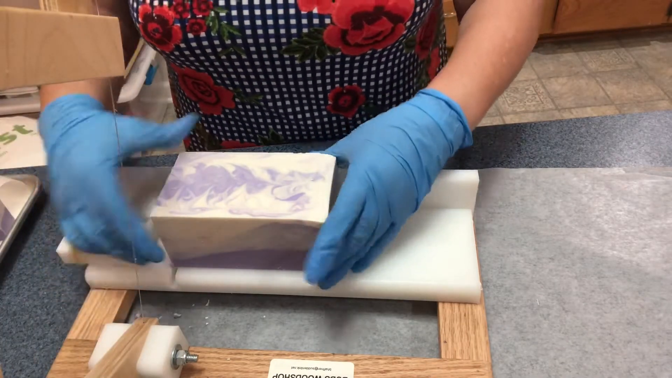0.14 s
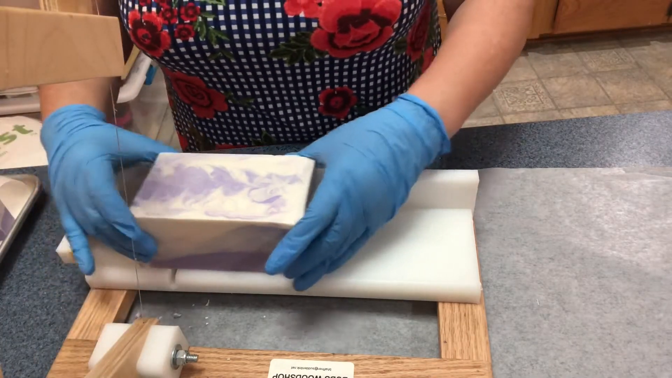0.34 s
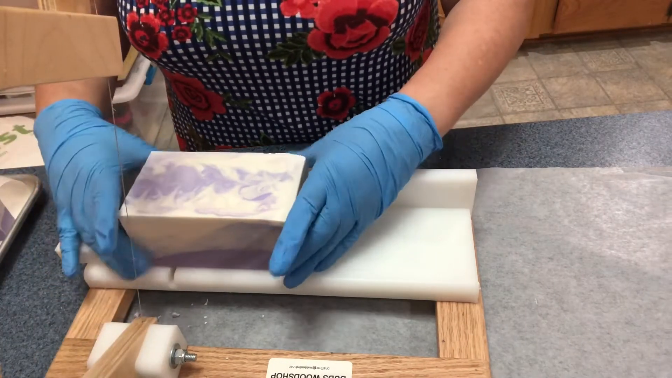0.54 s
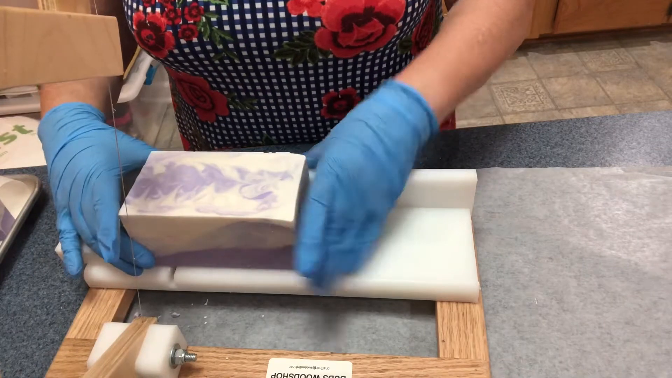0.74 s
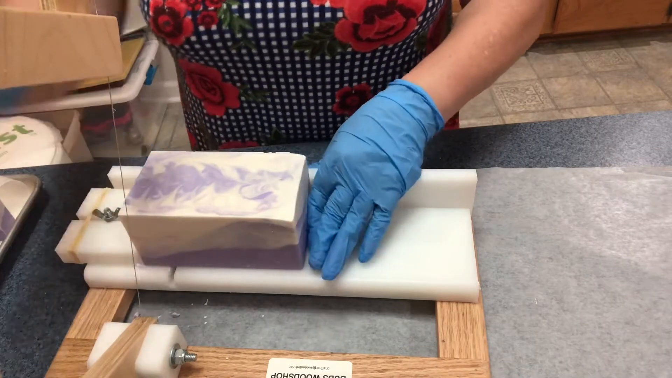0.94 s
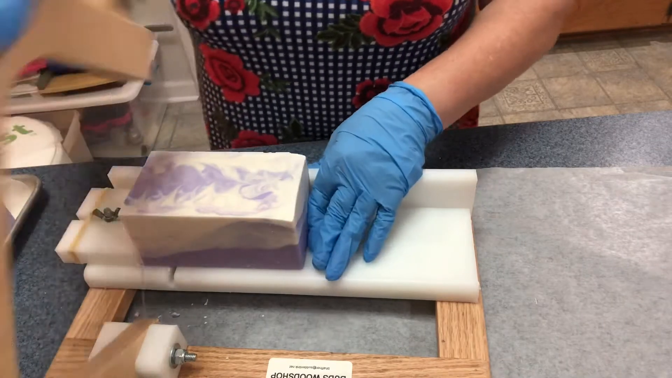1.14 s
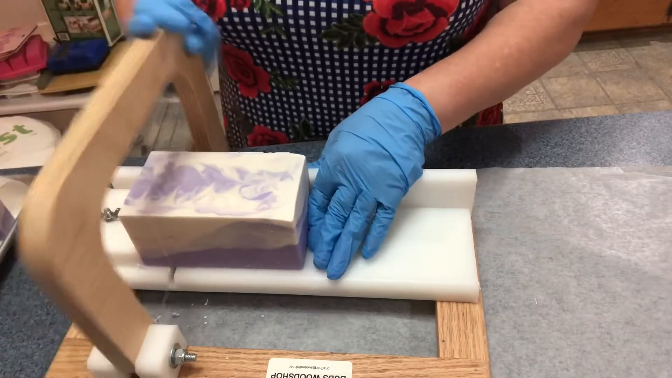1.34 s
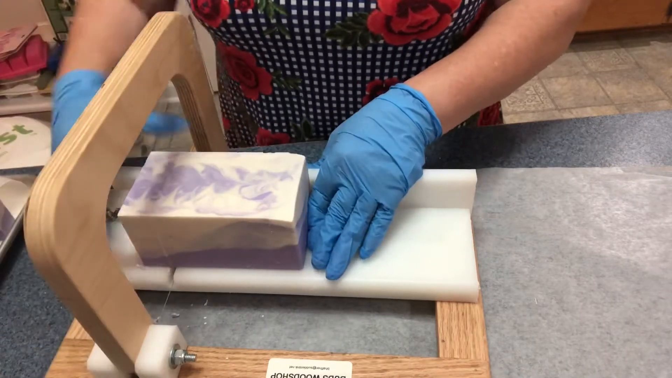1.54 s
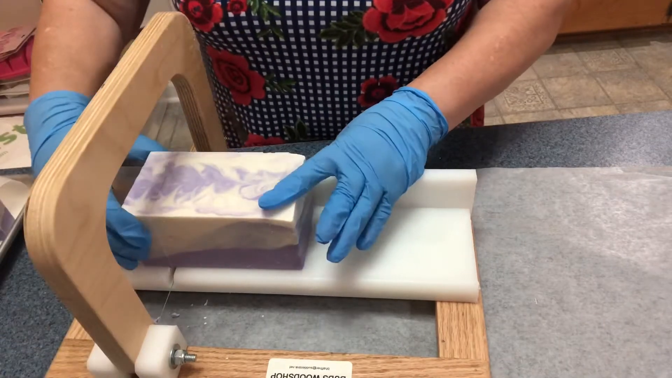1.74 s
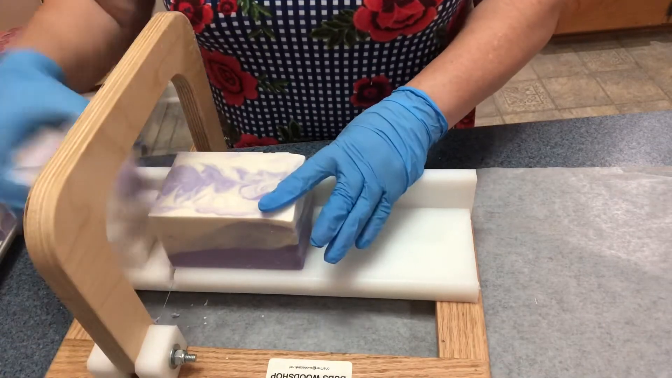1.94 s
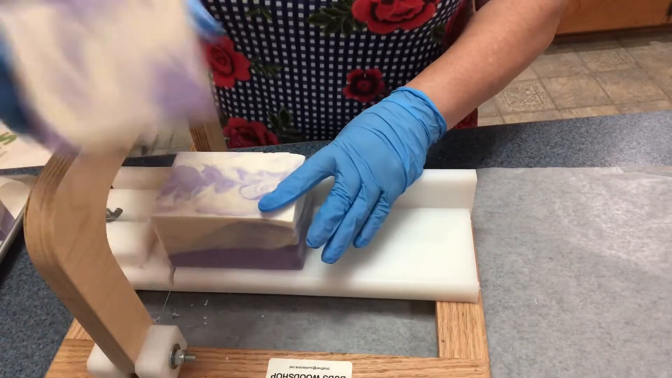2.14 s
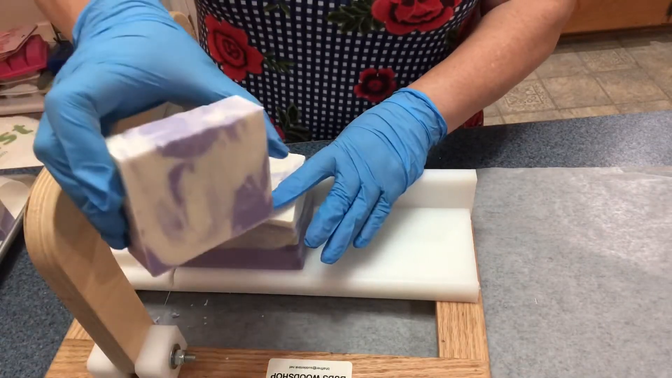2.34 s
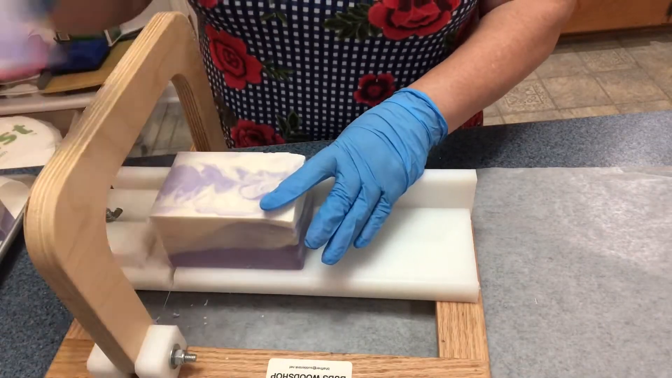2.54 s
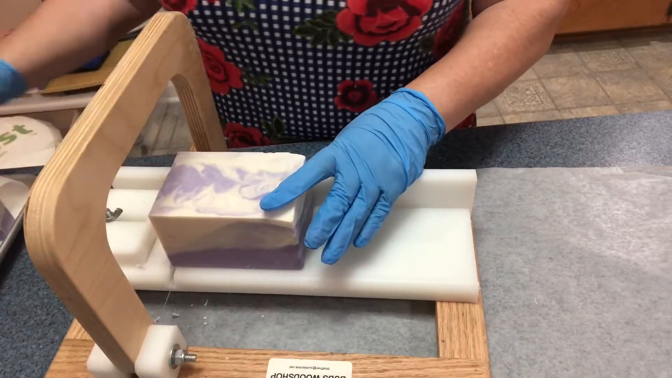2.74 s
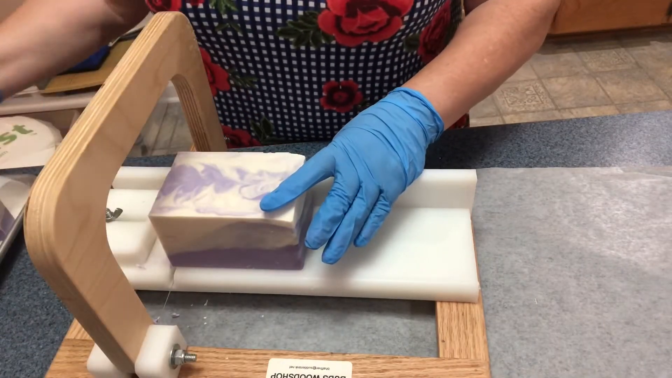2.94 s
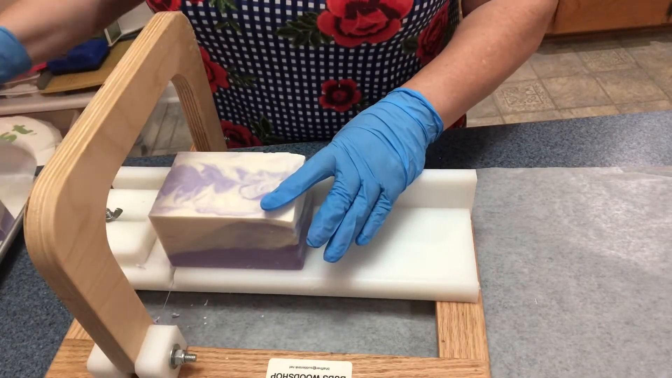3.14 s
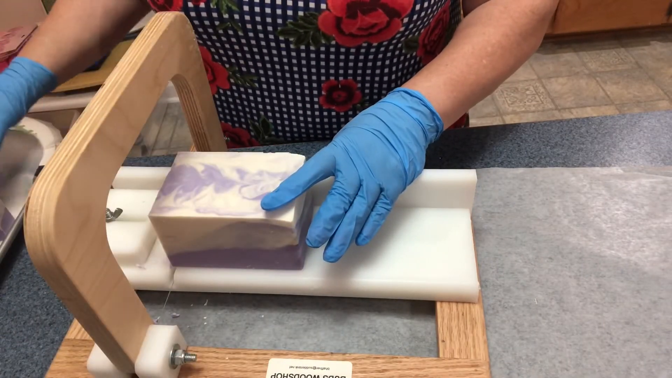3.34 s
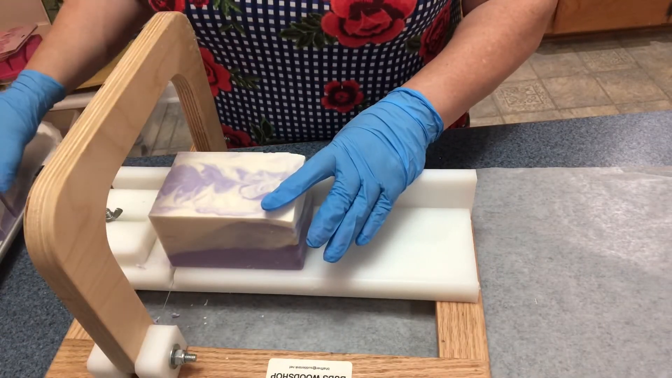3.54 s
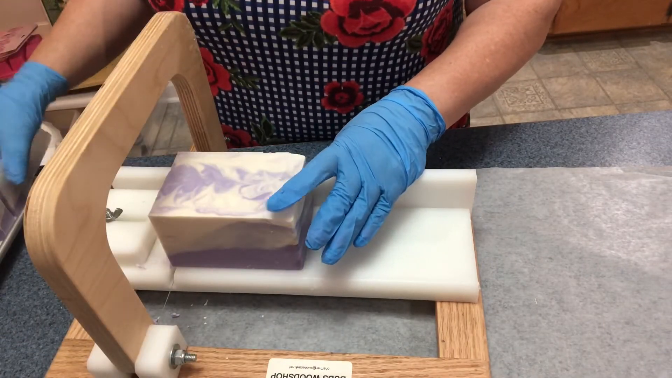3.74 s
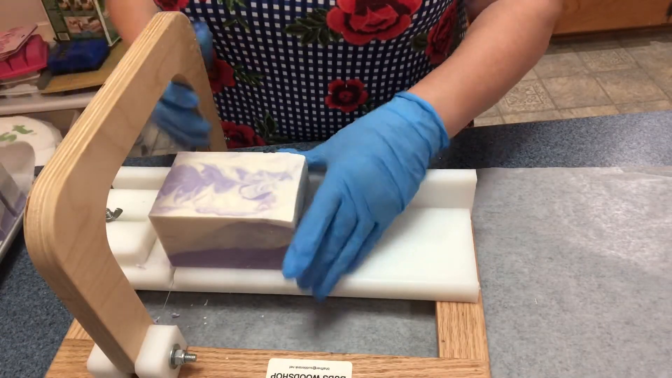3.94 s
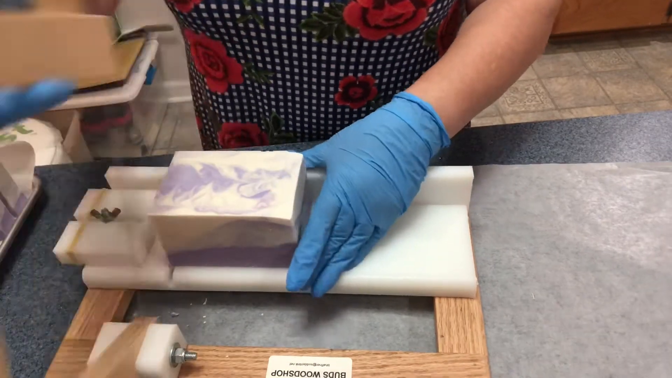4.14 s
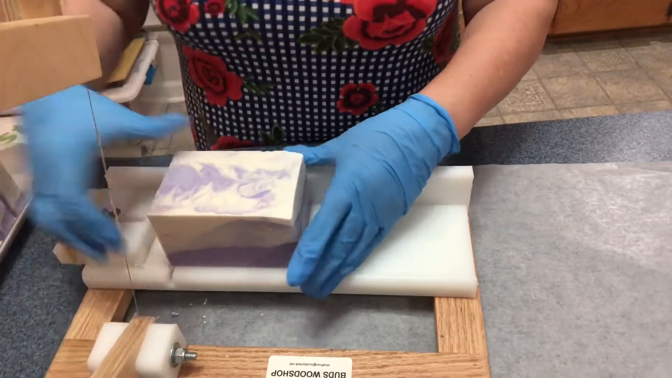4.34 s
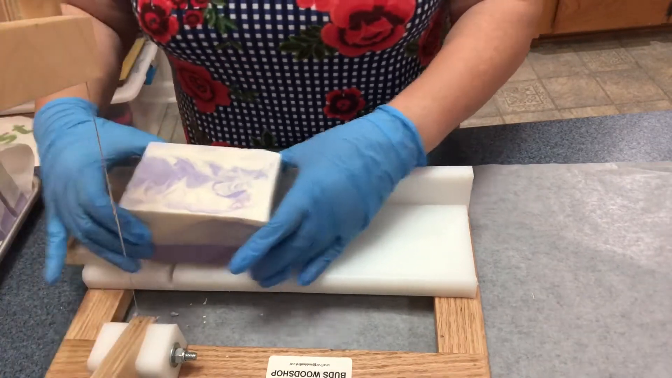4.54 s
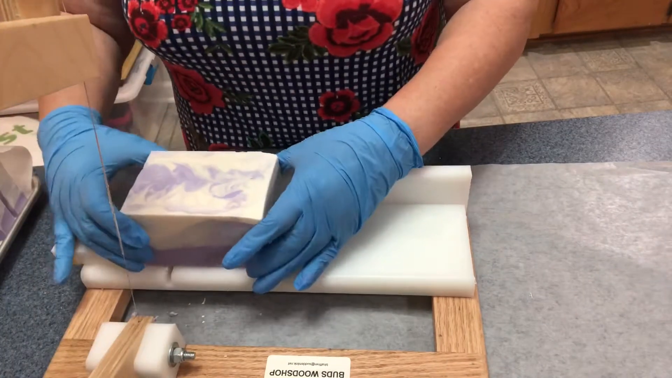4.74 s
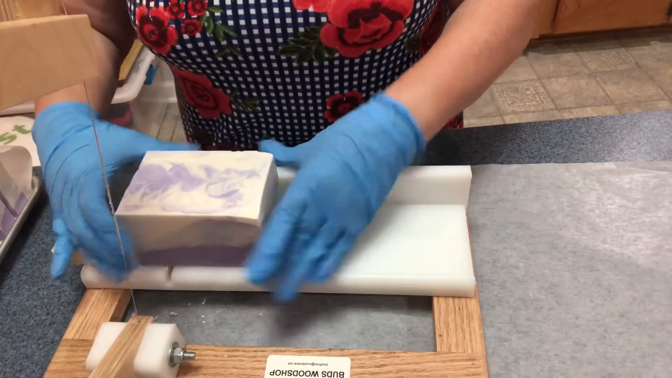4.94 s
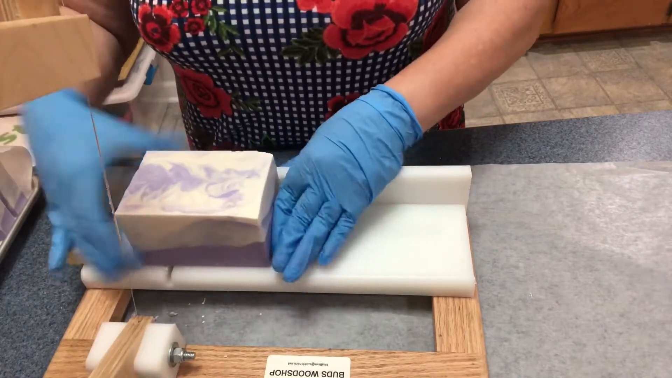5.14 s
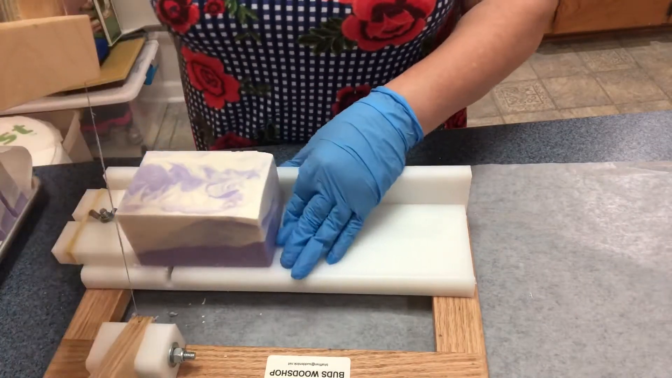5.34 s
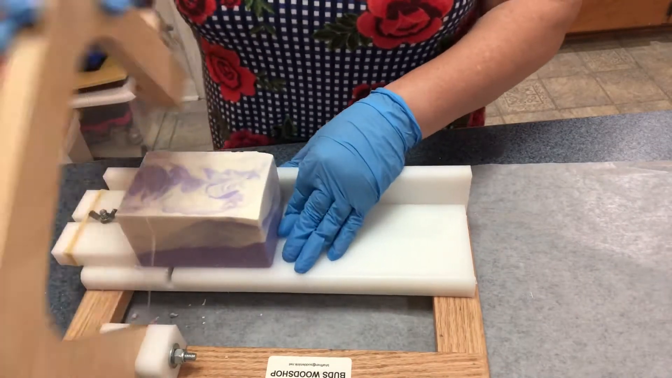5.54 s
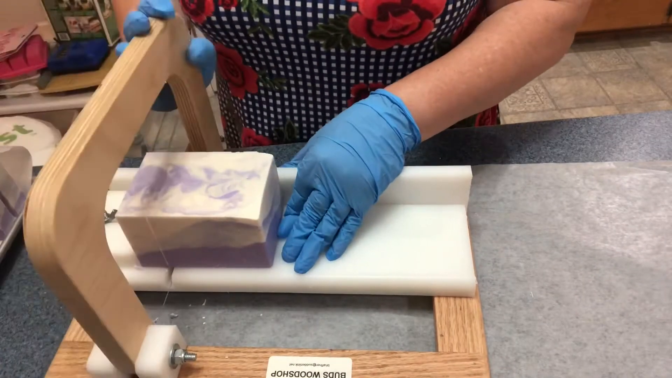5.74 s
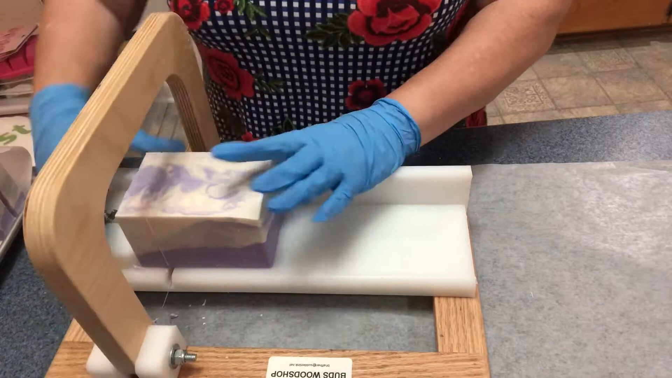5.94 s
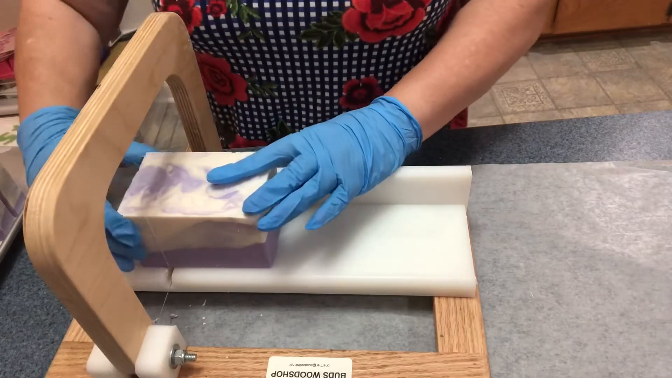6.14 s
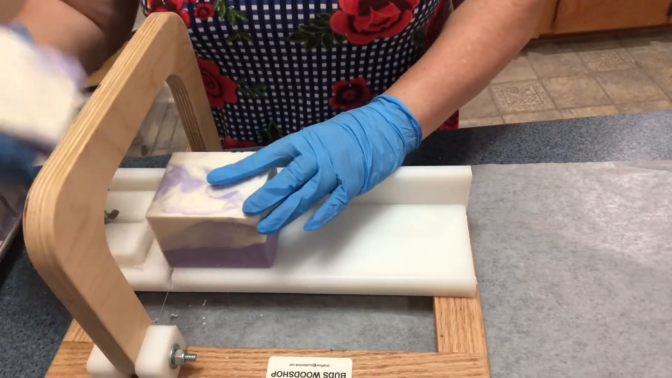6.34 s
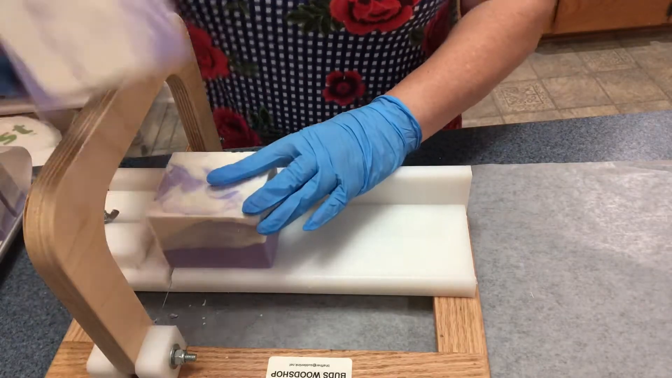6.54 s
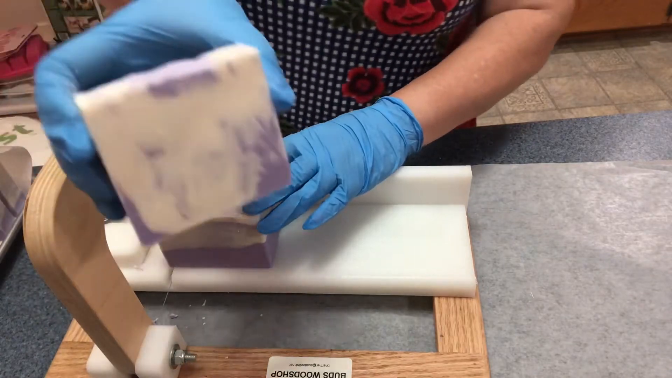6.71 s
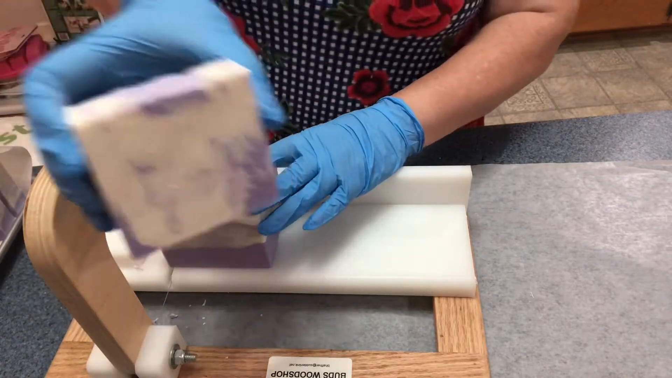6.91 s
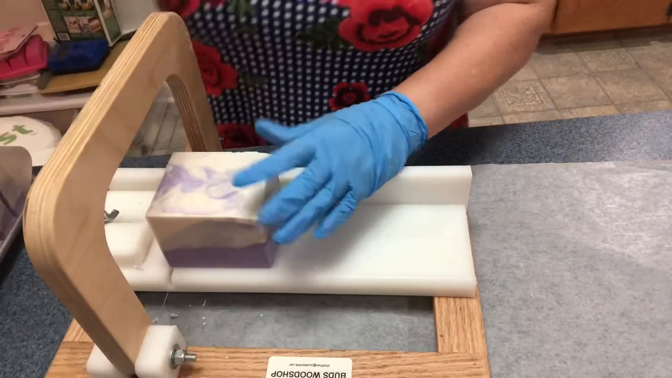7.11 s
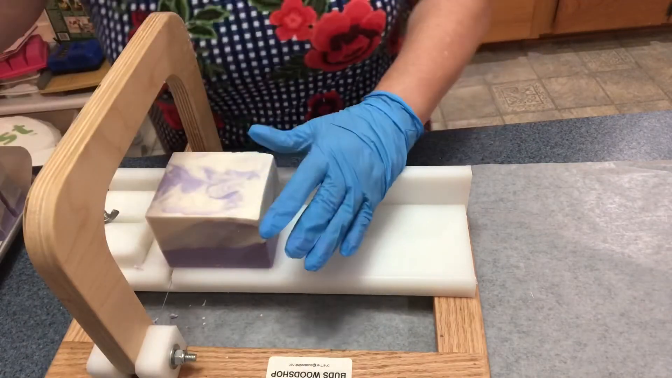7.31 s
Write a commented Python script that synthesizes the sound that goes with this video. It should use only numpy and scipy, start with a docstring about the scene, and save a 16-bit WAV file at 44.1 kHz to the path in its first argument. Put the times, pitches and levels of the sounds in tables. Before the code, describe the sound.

A wire soap cutter clacks sharply shut twice, with paper crackling and soft bumps and taps of the loaf in between.

```python
"""A soap loaf is cut twice on a wooden wire cutter in a small kitchen, while an appliance whines faintly.
First the wire hisses through the soap, then the arm touches its stop and slams home, ringing the frame.
Next a bar is laid on paper, which rustles and crackles as its creases snap.
Gloved hands slide and bump the loaf on the cutter's plastic bed.
Then comes the second hiss and slam, followed by a few light taps."""
import sys
import numpy as np
from scipy import signal
from scipy.fft import rfft, irfft
from scipy.io import wavfile

SR = 44100
rng = np.random.default_rng(int(sys.argv[2]) if len(sys.argv) > 2 else 0)


def wrap_up_sound(samples):
    """Save the sound to the file named by the first command line argument, as 16-bit audio."""
    columns = np.atleast_2d(samples).T
    # keep every value between -1 and 1, then stretch to whole-number steps
    tamed = np.clip(columns, -1, 1)
    steps = np.round(tamed * 32767).astype(np.int16)
    wavfile.write(sys.argv[1], SR, steps)


N = 325017
TIME = np.arange(N) / SR
AGE = TIME[:SR // 2]  # seconds since a blow
ROOM_T60 = 0.27  # a t60 is the time in seconds that a sound takes to fade by 60 dB

# The arm hits its stop, just after a light first touch:
# (time [s], relative slam level [dB], touch lead [s], relative touch level [dB], wire level [dB])
SLAMS = [(1.3093, -1, .0108, -22, -51), (5.6787, -1.5, .0141, -25.5, -67.5)]


def undb(db):
    """Turn decibels into a number to multiply by."""
    return 10 ** (np.asarray(db) / 20)


def unit(x):
    """Scale a sound to an average power of 1."""
    return x / np.sqrt(np.mean(x ** 2))


def add(out, time, x):
    """Mix x into out, starting at a time in seconds."""
    i = max(int(time * SR), 0)
    out[i:i + len(x)] += x[:N - i]


def fade(t60):
    """How a sound dies away after a blow."""
    return np.exp(-np.log(1000) * AGE / t60)


def fading_noise(t60, rise_s):
    """Noise that swells and dies away."""
    return rng.standard_normal(len(AGE)) * fade(t60) * (1 - np.exp(-AGE / rise_s))


def burst(t60, rise_s):
    """Fading noise with a total energy of 1."""
    noise = fading_noise(t60, rise_s)
    return noise / np.linalg.norm(noise)


def colour(x, spectrum, size=4096):
    """Shape the tone of x along (frequency [Hz], level [dB]) points; white noise keeps its power."""
    hz, db = np.transpose(spectrum)
    bins = np.maximum(np.fft.rfftfreq(size, 1 / SR), 1)
    gains = undb(np.interp(np.log(bins), np.log(hz), db))
    # these steps build a filter that never sounds ahead of its input
    cepstrum = irfft(np.log(gains))
    cepstrum[1:size // 2] *= 2
    cepstrum[size // 2 + 1:] = 0
    response = irfft(np.exp(rfft(cepstrum)))
    return signal.fftconvolve(x, response / np.linalg.norm(response))[:len(x)]


def hump(hz, below_db, above_db):
    """A tone shape that peaks at hz, given its levels one octave below and above."""
    octaves = np.linspace(-7, 7, 29)
    db = np.where(octaves < 0, below_db, above_db) * np.abs(octaves) ** 1.3
    return np.column_stack([hz * 2 ** octaves, np.maximum(db, -80)])


def drift(turns_per_s):
    """A random value that wanders, mostly between -1 and 1."""
    points = rng.standard_normal(N // 100)
    return np.interp(TIME * turns_per_s, np.arange(len(points)), points)


def grains(per_s, spread_db, t60):
    """Tiny slips of very unequal size, each a short burst of noise."""
    slipping = rng.random(N) < per_s / SR
    sizes = slipping * undb(spread_db * np.minimum(rng.exponential(size=N), 4))
    power = signal.fftconvolve(sizes ** 2, fade(t60) ** 2)[:N]
    return unit(np.sqrt(np.abs(power)) * rng.standard_normal(N))


def appliance(air_db=-64.5, waver_hz=3, flutter_db=2):
    """Steady moving air, a low hum and a thin whine that wavers."""
    # Tone of the moving air: (frequency [Hz], relative level [dB])
    air_colour = [(15, -80.5), (25, -46.5), (70, -32), (108, -8), (277, -5.5), (309, -6), (416, -4),
                  (451, -7), (489, -6), (607, -8.5), (734, -6), (1700, -10.5), (1840, -10), (2280, -15.5),
                  (16000, -31)]
    # Tones of the hum: (frequency [Hz], level [dB])
    hum_tones = [(119, -84), (382, -79), (420, -82), (479, -81), (757, -80), (945, -85.5), (2148, -82)]
    # Path of the whine: (time [s], frequency [Hz], level [dB])
    whine_path = [(1.6, 1870, -83), (1.9, 1877, -72.5), (6.5, 1876, -74), (7.35, 1868, -69.5)]
    air_gain = undb(air_db + 0.21 * drift(4.9))
    out = air_gain * unit(colour(rng.standard_normal(N), air_colour))
    times, whine_hz, whine_db = np.transpose(whine_path)
    whine = (np.interp(TIME, times, whine_hz), np.interp(TIME, times, whine_db))
    for hz, db in hum_tones + [whine]:
        phase = 2 * np.pi * np.cumsum(hz + waver_hz * drift(25)) / SR
        out += np.sqrt(2) * undb(db + flutter_db * drift(3.4)) * np.sin(phase)
    return out


def kitchen(x, echo_db=-9):
    """Cupboards and walls add a short, blurred echo."""
    return x + undb(echo_db) * signal.fftconvolve(x, burst(ROOM_T60, rise_s=0.0034))[:N]


def rubs(gain_db=-.5, catch_db=-7, cut_lead_s=.16, cut_length_s=.33, cut_db=-67.5, cut_hz=7000):
    """Gloves, soap and wire stick and slip, catching now and then; each stroke swells and fades."""
    # Gloves and loaf slide on the bed: (middle time [s], length [s], relative level [dB], pitch [Hz])
    slides = [(0.082, .029, -66, 10000), (.233, 0.012, -64.5, 5100), (0.437, 0.018, -53.5, 9000),
              (.682, .06, -64, 5800), (.76, .044, -58.5, 7600), (1.602, 0.16, -69.5, 7000),
              (1.853, 0.017, -64, 8000), (3.916, 0.016, -53.5, 6100), (4.041, 0.19, -61, 6500),
              (4.115, 0.02, -57.5, 1220), (4.189, .025, -56, 7000), (4.388, 0.067, -67, 5650),
              (4.601, 0.042, -56.5, 5100), (4.887, .029, -59, 4080), (4.963, 0.022, -59.5, 6500),
              (5.1, 0.0094, -44.5, 6600), (5.298, .045, -61, 5860)]
    # the wire hisses through the soap ahead of each slam
    cuts = [(slam[0] - cut_lead_s, cut_length_s, cut_db, cut_hz) for slam in SLAMS]
    slips = grains(per_s=2000, spread_db=3, t60=.0055)
    slips += undb(catch_db) * grains(per_s=36, spread_db=2, t60=.006)
    out = np.zeros(N)
    for middle, length, db, hz in slides + cuts:
        moving = np.abs(TIME - middle) < length
        swell = np.exp(-(2 * (TIME[moving] - middle) / length) ** 2)
        stroke = colour(slips[moving] * swell, hump(hz, below_db=-4, above_db=-7))
        add(out, middle - length, undb(db + gain_db) * stroke)
    return out


def bumps(gain_db=16, settle_db=-6):
    """Dull thuds that sink in pitch as the bed settles under the loaf."""
    # Loaf and hands bump the plastic bed: (time [s], relative level [dB], pitch [Hz])
    contacts = [(0.35, -43, 310), (.561, -39.5, 332), (1.186, -47, 198), (1.799, -48.5, 296),
                (3.901, -38.5, 423), (3.93, -38.5, 283), (4.157, -39.5, 290), (4.515, -30.5, 337),
                (4.608, -39.5, 288), (4.654, -46, 200), (5.319, -47.5, 203), (5.539, -47, 191.4),
                (6.122, -47, 406)]
    out = np.zeros(N)
    for time, db, hz in contacts:
        thud = colour(burst(t60=.075, rise_s=.0022), hump(hz, below_db=-18, above_db=-15))
        settle = colour(burst(t60=.14, rise_s=.03), hump(hz / 2, below_db=-18, above_db=-15))
        bump = thud / np.linalg.norm(thud) + undb(settle_db) * settle / np.linalg.norm(settle)
        add(out, time, undb(db + gain_db) * bump)
    return out


def taps(gain_db=18, echo_db=-11, hollow_db=-5, rise_s=.00019):
    """Each tap is a snap with a faint room echo, plus a hollow note at its own pitch."""
    # Loaf, fingers and arm tap the bed: (time [s], relative level [dB], pitch [Hz], t60 [s])
    contacts = [(0.3463, -36.5, 5200, .016), (0.469, -50, 2930, .014), (0.562, -47.5, 3740, .015),
                (0.686, -48, 2980, 0.012), (0.7825, -44, 2900, 0.015), (1.013, -51.5, 10100, .012),
                (1.039, -48, 5100, .02), (1.198, -49, 4500, 0.012), (1.5543, -39.5, 4160, 0.031),
                (3.901, -50, 2480, .012), (3.9326, -43.5, 5500, 0.017), (3.938, -40.5, 2800, 0.017),
                (4.176, -38, 10400, 0.018), (4.198, -47, 5330, 0.017), (4.5159, -37.5, 6060, 0.012),
                (4.602, -44.5, 4100, 0.021), (4.6985, -47.5, 6020, 0.026), (4.893, -42.5, 3000, 0.022),
                (5.1013, -32.5, 1920, 0.0038), (5.299, -41.5, 4740, 0.0031), (5.543, -51, 6000, 0.0072),
                (5.8758, -53, 4540, .009), (6.396, -49.5, 9900, .014), (6.446, -47, 9000, .019),
                (7.067, -54, 1400, 0.019)]
    out = np.zeros(N)
    for time, db, hz, t60 in contacts:
        noise = burst(t60, rise_s) + undb(echo_db) * burst(ROOM_T60, rise_s=.0027)
        snap = colour(noise, hump(hz, below_db=-1.5, above_db=-3.5))
        hollow = colour(burst(t60, rise_s), hump(hz, below_db=-22, above_db=-22))
        add(out, time, undb(db + gain_db) * (snap + undb(hollow_db) * hollow))
    return out


def paper_push(start, length, attack_s=.0076, release_s=.0084, relax_db=-10, relax_s=.084):
    """The strength of one push: it rises, holds and drops, then lingers as the sheet relaxes."""
    attack = np.exp(np.minimum(TIME - start, 0) / attack_s)
    since_end = np.maximum(TIME - start - length, 0)
    release = np.exp(-since_end / release_s)
    relax = undb(relax_db) * np.exp(-since_end / relax_s)
    return attack * np.maximum(release, relax)


def paper(gain_db=-.5, crinkle_db=-3, firm_db=-48, crinkle_growth=.78):
    """Paper gives a dense crackle under a firm push; single crinkles stand out under a light one."""
    # The bar is set down and nudged: (start time [s], length [s], relative level [dB])
    pushes = [(2.704, 0.17, -69), (2.959, .11, -47), (3.278, 0.28, -75), (3.391, 0.017, -53),
              (3.507, 0.032, -53), (3.667, 0.19, -71), (3.73, 0.02, -57)]
    # Tone of the sheet: (frequency [Hz], relative level [dB])
    sheet_colour = [(180, -34), (300, -3), (634, -8), (737, -2), (1360, -8.5), (1640, -7), (3640, -1.5),
                    (4230, -3.5), (7200, -1), (13500, -6), (16000, -21.5)]
    crackle = grains(per_s=2000, spread_db=3.8, t60=.005)
    crinkle = grains(per_s=90, spread_db=2.5, t60=.006)
    pressure = sum(undb(db - firm_db) * paper_push(start, length) for start, length, db in pushes)
    rustle = pressure * crackle + undb(crinkle_db) * pressure ** crinkle_growth * crinkle
    return undb(firm_db + gain_db) * colour(rustle, sheet_colour)


def creases(gain_db=18, echo_db=-12):
    """Paper creases give way with one bright snap each."""
    # Creases snapping: (time [s], relative level [dB])
    snaps = [(2.724, -50), (2.76, -49.5), (2.82, -48.5), (2.957, -45), (2.963, -37.5), (3.034, -53),
             (3.0482, -27), (3.062, -32.5), (3.396, -43), (3.407, -41), (3.455, -36.5), (3.5017, -35),
             (3.507, -34), (3.536, -32), (3.5479, -40), (3.685, -46), (3.7193, -47), (3.757, -53),
             (3.836, -46)]
    out = np.zeros(N)
    for time, db in snaps:
        snap = burst(t60=.011, rise_s=.0004)
        echo = undb(echo_db) * burst(ROOM_T60, rise_s=.0029)
        add(out, time, undb(db + gain_db) * (snap + echo))
    return colour(out, hump(12000, below_db=-2.5, above_db=-8))


def ring(tones, delay_at_1khz_s, rise_cycles):
    """A struck part rings with fading tones; low ones travel through it more slowly and arrive later."""
    out = np.zeros(len(AGE))
    for k, (hz, db, t60) in enumerate(tones):
        age = np.maximum(AGE - delay_at_1khz_s / np.sqrt(hz / 1000), 0)
        swell = 1 - np.exp(-(age * hz / rise_cycles) ** 2)
        out += (-1) ** k * undb(db) * swell * fade(t60) * np.sin(2 * np.pi * hz * age)
    return out


def stop_crack(chatter_db=-17, edge_db=-4):
    """The arm cracks against its stop: the uneven faces chatter and the hard edge adds a bright snap."""
    # Tones of the hard contact: (frequency [Hz], relative level [dB], t60 [s])
    contact_tones = [(1290, -15, .007), (1880, -13.5, 0.015), (2950, -8.5, 0.0065), (4040, 1, 0.0036),
                     (6037, 0.5, 0.004), (7280, -5.5, .006), (9600, -16.5, .003), (12370, -4, 0.0017),
                     (14300, -8.5, 0.0023)]
    contact = ring(contact_tones, delay_at_1khz_s=.0004, rise_cycles=2)
    chatter_noise = rng.standard_normal(len(AGE)) * fade(t60=.011)
    chatter = colour(chatter_noise, hump(7100, below_db=-2.5, above_db=-1))
    edge = colour(fading_noise(t60=.0045, rise_s=.00035), hump(14000, below_db=-22.5, above_db=-6.5))
    return contact + undb(chatter_db) * chatter + undb(edge_db) * edge


def slams(wire_hz=383, wire_t60=.88):
    """The arm touches its stop, then hits it: a sharp crack, the frame's ring and a noisy tail."""
    # Tones of the wooden frame and its plastic bed: (frequency [Hz], relative level [dB], t60 [s])
    frame_tones = [(72, -22, 0.027), (135, -7, 0.075), (205, -13.5, 0.1), (247, -9.5, .09),
                   (279, -7.5, 0.2), (330, 2, 0.14), (367.4, 4.5, 0.083), (396, -2, .09), (396, -5.5, 0.13),
                   (478, -8.5, 0.12), (533, -7.5, 0.23), (547, -10, 0.086), (673, -13.5, 0.063),
                   (744, -9, 0.13), (785, -15, 0.064), (920, -4, 0.092), (1040, -9.5, 0.11),
                   (1073, -12, 0.14), (1273, -11.5, 0.11), (1444, -13.5, 0.16), (1790, -15, 0.11),
                   (1930, -15.5, 0.15), (2050, -11, 0.2), (2180, -14, 0.062), (2600, -20, 0.2),
                   (2980, -18.5, 0.076), (3670, -19.5, 0.17)]
    # Dense ringing of frame and room after a slam: (frequency [Hz], relative level [dB])
    tail_colour = [(30, -18), (90, -10.5), (140, -3), (330, 2), (600, -3.5), (1100, -6), (1600, -6.5),
                   (2100, -7), (3200, -10.5), (5000, -12), (6400, -8), (8200, -13), (10000, -16),
                   (15500, -22.5)]
    crack = stop_crack()
    frame = ring(frame_tones, delay_at_1khz_s=.001, rise_cycles=.45)
    tail = colour(fading_noise(t60=.22, rise_s=.0018), tail_colour)
    thump = np.exp(-((AGE - .006) / .002) ** 2)  # a brief, deep thump under each slam
    touch = undb(3) * crack + undb(-14) * frame + undb(-23.5) * tail
    blow = undb(5.5) * crack + undb(-19) * frame + undb(-20) * tail + undb(-36) * thump
    wire = fade(wire_t60) * np.sin(2 * np.pi * wire_hz * AGE)  # the tight wire sings on
    out = np.zeros(N)
    for time, slam_db, early_s, touch_db, wire_db in SLAMS:
        add(out, time - early_s, undb(touch_db) * touch)
        add(out, time, undb(slam_db) * blow + undb(wire_db) * wire)
    return out


def scene():
    """Two cuts and the handling around them, in one channel."""
    hits = slams() + taps() + creases() + bumps()
    rustles = kitchen(paper() + rubs())
    return (hits + rustles + appliance())[None]


def record(dry, peak_limit=.8, top_hz=16300):
    """Round off the loudest peaks and cut the highest treble."""
    rounded = dry / (1 + (dry / peak_limit) ** 4) ** (1 / 4)
    treble_cut = signal.ellip(10, .2, 90, top_hz, fs=SR, output="sos")
    return signal.sosfilt(treble_cut, rounded)


dry = scene()
out = record(dry)
wrap_up_sound(out)
```